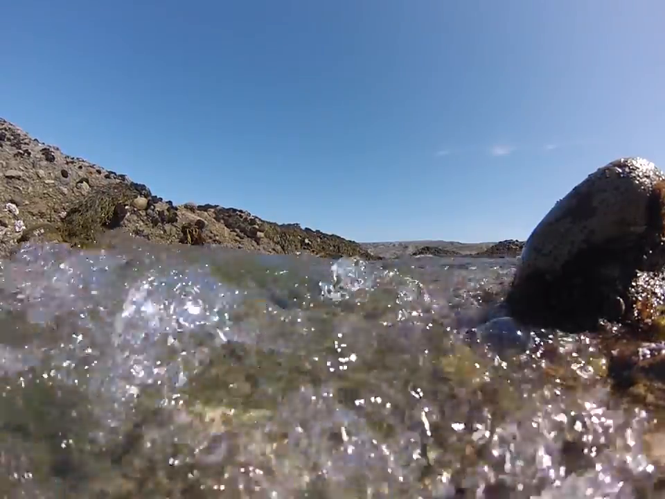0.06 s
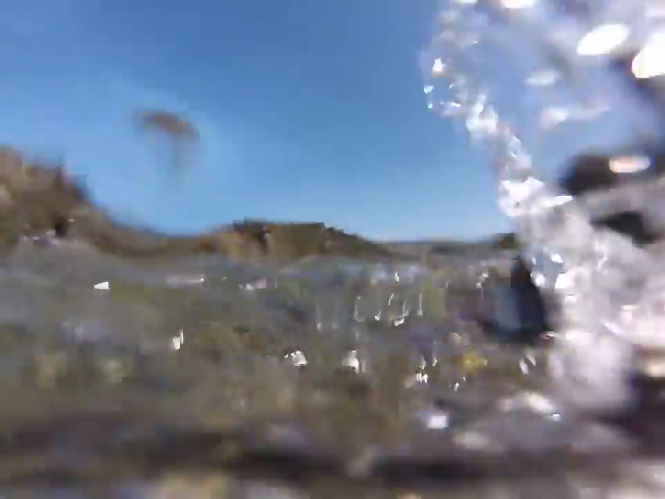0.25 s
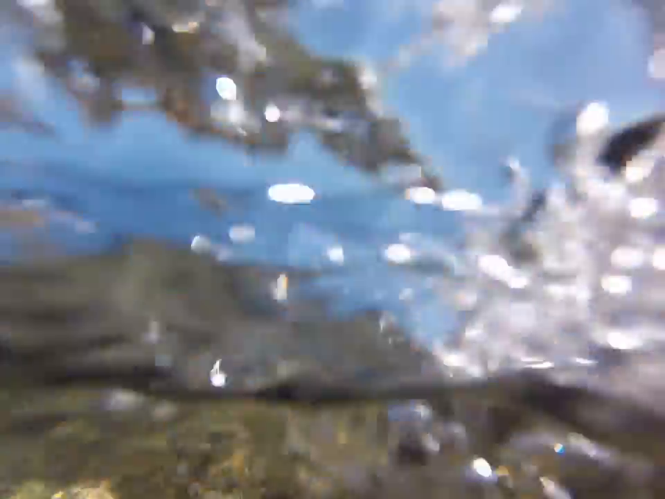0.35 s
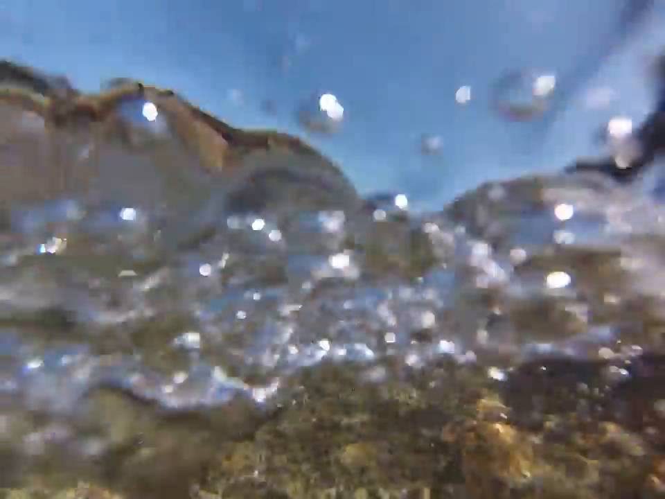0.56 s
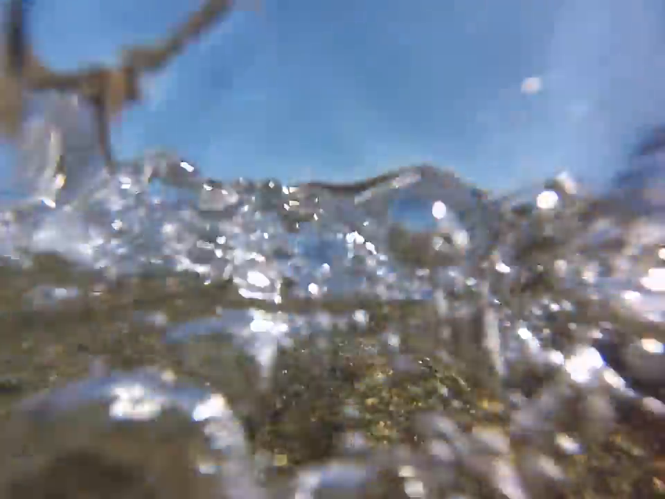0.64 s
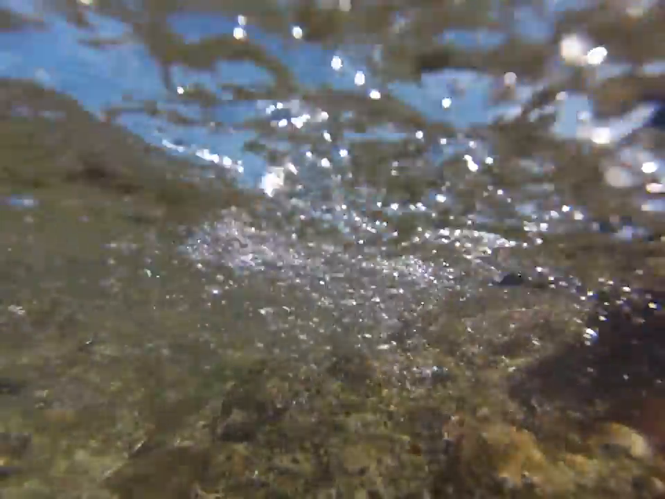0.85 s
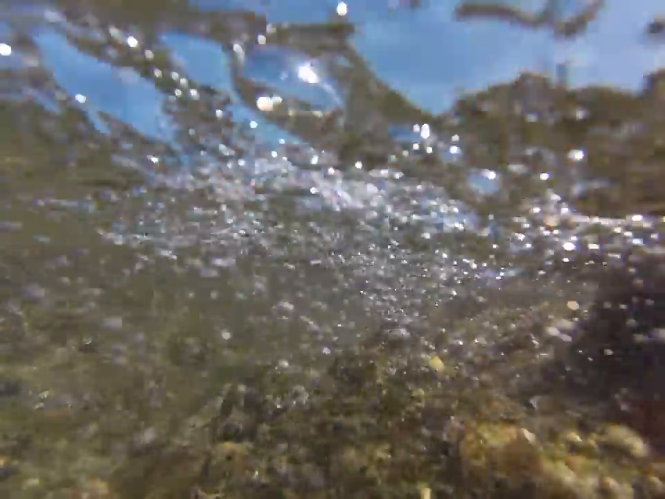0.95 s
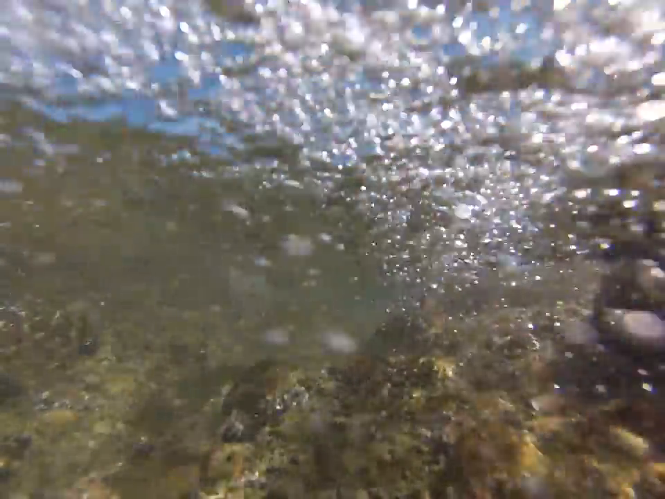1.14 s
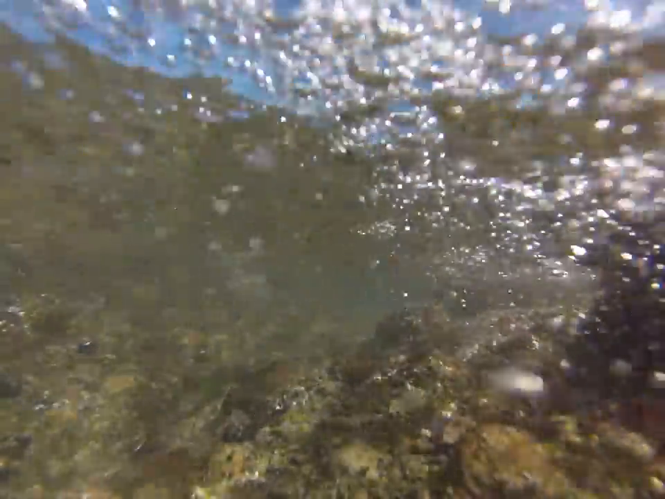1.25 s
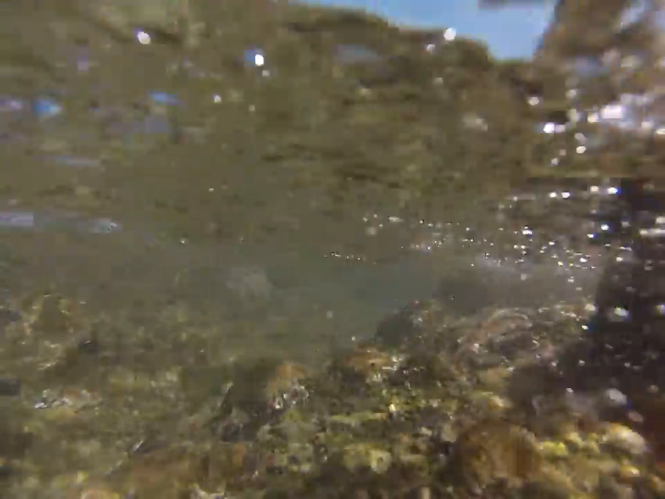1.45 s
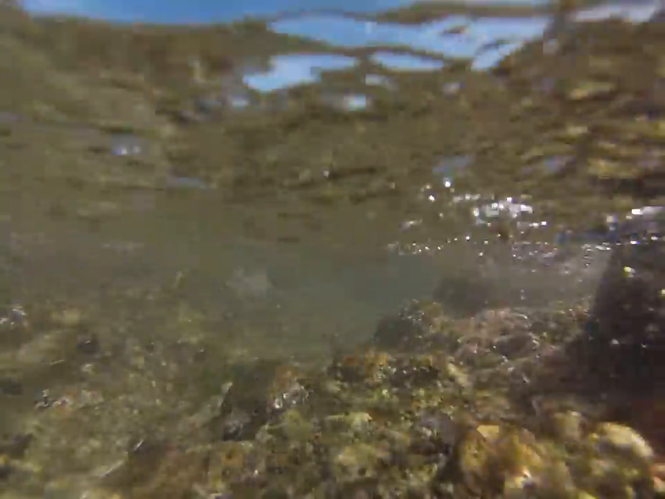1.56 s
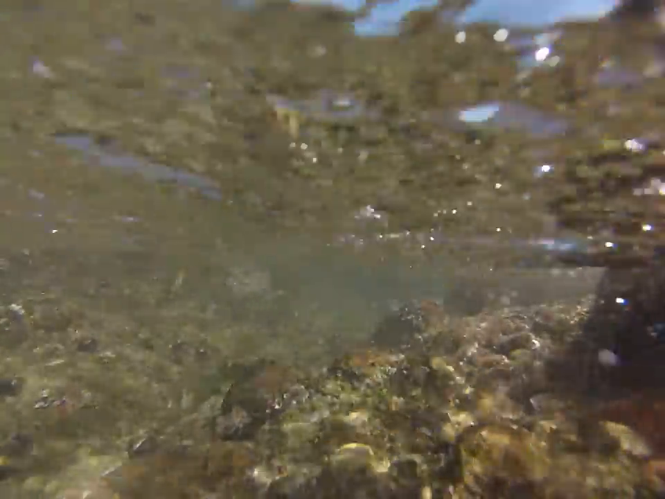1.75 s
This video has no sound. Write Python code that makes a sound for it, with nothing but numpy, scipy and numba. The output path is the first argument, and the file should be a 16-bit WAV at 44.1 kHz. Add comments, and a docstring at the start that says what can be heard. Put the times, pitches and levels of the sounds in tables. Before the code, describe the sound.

Sudden wet splash over a microphone in a waterproof housing, outdoors at the water's edge; then close underwater bubbling, thinning out, a late cluster of glugs with deep rumbling, and a fade to near silence.

```python
"""A wave breaks over a small camera in a waterproof housing at a rocky shore, and the housing goes under.
A faint hiss of shaped noise and the rumble of water on the housing run from the start.
Spray swells and strikes as clouds of tiny rings with a low blow of noise, then cuts off.
Bubbles ring close by as short rising tones, droplets tick, and a swarm of small bubbles gurgles.
Late on, air trapped at the housing glugs in its own resonances while the rumble is strongest."""
import sys
import numpy as np
from scipy import signal
from scipy.fft import rfft, irfft
from scipy.io import wavfile
from numba import njit

SR = 44100
rng = np.random.default_rng(int(sys.argv[2]) if len(sys.argv) > 2 else 0)


def gain_from_db(level_db):
    """Turn a decibel level (scalar or array-like) into a linear amplitude factor."""
    decades = np.asarray(level_db, float) / 20
    return 10 ** decades


def log_audio(samples):
    """Write samples as a 16-bit WAV file to the path given in sys.argv[1]."""
    # one column per channel
    frames = np.atleast_2d(samples).T
    # limit to full scale, then quantise
    limited = np.clip(frames, -1, 1)
    pcm = np.round(limited * 32767).astype(np.int16)
    wavfile.write(sys.argv[1], SR, pcm)


N = 79380  # samples, 1.8 s
RISE_S, GLIDE = 0.00063, 0.13  # swell time constant of a ring; share its pitch climbs over one t60


def level(x, db):
    """Scale to an rms level in dB."""
    return x * gain_from_db(db) / np.sqrt(np.mean(x ** 2))


def curve(table):
    """Gain over time along a table of seconds and dB."""
    rows = np.array(table)
    return gain_from_db(np.interp(np.arange(N) / SR, rows[:, 0], rows[:, 1]))


def band(x, lo_hz, hi_hz):
    """Band-pass between two corner frequencies."""
    return signal.sosfilt(signal.butter(2, [lo_hz, hi_hz], "band", fs=SR, output="sos"), x)


def noise_band(lo_hz, hi_hz, db):
    """Band of noise at an rms level."""
    return level(band(rng.standard_normal(N), lo_hz, hi_hz), db)


@njit
def rings(n, start, size, hz, t60, rise, glide):
    """Damped tones that swell quickly and, where glide is above 0, climb a little as they fade."""
    out = np.zeros(n)
    for k in range(len(start)):
        fall, grow = np.log(1000) / t60[k], 1 / rise
        # time of the envelope's peak, which is scaled to size
        top = np.log(1 + 2 * grow / fall) / grow
        norm = size[k] / ((1 - np.exp(-grow * top)) ** 2 * np.exp(-fall * top))
        first, phase = int(start[k] * SR), 0.
        for i in range(min(int((t60[k] + top) * SR), n - first)):
            t = i / SR
            phase += min(hz[k] * (1 + glide * t / t60[k]) / SR, .4)
            envelope = (1 - np.exp(-grow * t)) ** 2 * np.exp(-fall * t)
            out[first + i] += norm * envelope * np.sin(2 * np.pi * phase)
    return out


def snaps(start, size, t60):
    """A broad, decaying burst of noise where each surface pinches off."""
    marks = np.zeros(N)
    marks[(start * SR).astype(int)] = size
    envelope = signal.lfilter([1], [1, -np.exp(-np.log(1000) / t60 / SR)], marks)
    return envelope * rng.standard_normal(N)


def cloud(per_s, hz, octaves, cycles, spread_db):
    """Bubbles of random time, size, pitch and ring length (cycles on average); rms 1."""
    u = rng.random((4000, 5))
    start = np.cumsum(-np.log(1 - u[:, 0])) / per_s
    # triangular scatter of pitch, octaves being its standard deviation
    pitch = np.clip(hz * 2 ** (octaves * np.sqrt(6) * (u[:, 1] + u[:, 2] - 1)), 300, 15000)
    # squaring makes large bubbles rare; those past the end are silent
    size = gain_from_db(spread_db * u[:, 3] ** 2) * (start < N / SR)
    t60 = cycles * (.5 + u[:, 4]) / pitch
    return level(rings(N, np.minimum(start, N / SR), size, pitch, t60, RISE_S, GLIDE), 0)


# Colour of the faint floor behind the water.
# Each row: frequency in Hz, relative density in dB per Hz.
HISS_COLOUR = [(88, -37), (150, 3), (398, -10), (2140, -24.5), (12700, -28.5), (16000, -51.5)]


def hiss():
    """Steady floor: noise shaped in frequency, at one level throughout."""
    rows, f = np.array(HISS_COLOUR), np.arange(N // 2 + 1) * SR / N + 1
    gain = gain_from_db(np.interp(np.log(f), np.log(rows[:, 0]), rows[:, 1]))
    return level(irfft(rfft(rng.standard_normal(N)) * gain, N), -73.5)


# Force of the wave at the rocks as it nears and strikes the housing.
# Each row: time in seconds, gain in dB on the spray and the low blow.
STRIKE_FORCE = [(0, -76.5), (.235, -64.5), (.26, -37), (.3, -30), (.345, -40), (.36, -59.5), (.47, -59.5)]


def strike():
    """Force of the wave: swells as it nears, peaks at the blow, ends as the water closes; gain over time."""
    end_s = STRIKE_FORCE[-1][0]
    return curve(STRIKE_FORCE) * (np.arange(N) / SR < end_s)


# Water pushing on the housing, right at the microphone.
# Each row: time in seconds, level of the push in dB.
PUSH_LEVEL = [(0, -69), (.18, -63.5), (.3, -58.5), (.55, -51), (1.2, -63.5), (1.36, -49), (1.54, -44),
              (1.8, -71)]


def rumble(near):
    """Water pushes on the housing, sloshes with the swarm and thuds with every nearby burst."""
    push = noise_band(24.1 / 2, 24.1 * 1.84, 0)
    slosh = noise_band(150 / 1.1, 150 * 2, -19)
    # the rectified mid band follows the nearby bursts
    bursts = np.abs(band(near, 450, 2100))
    thud = band(bursts, 138 / 3, 138 * 2) * gain_from_db(-14.5)
    blow = noise_band(138.4 / 2, 138.4 * 2, -11)
    return strike() * blow + curve(PUSH_LEVEL) * push + curve(SWARM_LEVEL) * slosh + thud


def spray():
    """Dense spray, low churn and crackling foam at the strike: crowds of rings and noise snaps."""
    droplets = cloud(per_s=2200, hz=3785, octaves=0.92, cycles=19, spread_db=32)
    churn = gain_from_db(3) * cloud(per_s=2000, hz=1950, octaves=0.393, cycles=20, spread_db=23)
    when, size = rng.random((600, 2)).T
    foam = level(band(snaps(when * N / SR, size * size, TICK_T60_S), 2400, 17000), -12)
    return strike() * (droplets + churn + foam)


def stirring():
    """Every large bubble or glug sheds a short flurry of small ones; gain over time."""
    flurry_s = 0.0055
    starts = np.array([row[0] for row in BUBBLE_RINGS + GLUG_BURSTS])
    marks = np.zeros(N)
    marks[(starts * SR).astype(int)] = gain_from_db(6.5)
    return 1 + signal.lfilter([1], [1, -np.exp(-1 / flurry_s / SR)], marks)


# Small bubbles in the water around the housing, and the slosh that moves with them.
# Each row: time in seconds, gain in dB before the flurries and the mix of layers.
SWARM_LEVEL = [(0, -79), (.23, -51), (.37, -44.5), (.78, -44), (.98, -46), (1.04, -57), (1.1, -47),
               (1.19, -59), (1.4, -52.5), (1.56, -50.5), (1.68, -68)]


def swarm():
    """Gurgle of many small ringing bubbles with finer, higher fizz above it."""
    gurgle = cloud(per_s=900, hz=1394.6, octaves=.55, cycles=42.2, spread_db=18.5)
    fizz = cloud(per_s=1600, hz=5300, octaves=0.75, cycles=17, spread_db=30)
    return curve(SWARM_LEVEL) * stirring() / 2 * (gurgle + gain_from_db(-19.5) * fizz)


# Droplets and tiny bubbles that tick near the microphone.
# Each row: start in seconds, peak of the tone in dB, pitch in Hz.
DROPLET_TICKS = [(0.1866, -47, 7130), (0.2297, -39.5, 7500), (0.4899, -29.5, 10300), (0.5333, -35.5, 9500),
                 (0.5644, -40, 7140), (0.7551, -52, 6000), (0.7881, -45.5, 6700), (0.8492, -38.5, 12000),
                 (0.8786, -45, 11200), (1.089, -39, 7260), (1.2665, -43, 10450), (1.4496, -35.5, 7370)]
TICK_T60_S = 0.0048


def ticks():
    """Tiny bright ticks: a short steady-pitched ring with a snap of noise."""
    start, db, hz = np.array(DROPLET_TICKS, float).T.copy()
    tone = rings(N, start, gain_from_db(db), hz, np.full_like(start, TICK_T60_S), RISE_S / 2, 0.)
    return tone + band(snaps(start, gain_from_db(db - 1), TICK_T60_S), 2000, 15000)


# Glugs of an air pocket trapped at the housing.
# Each row: start in seconds, base level in dB, extra level of overtones and snap in dB.
GLUG_BURSTS = [(1.345, -36, -5.5), (1.388, -35.5, 0), (1.419, -40, -7), (1.429, -28.5, 4),
               (1.462, -36.5, 2.5), (1.502, -45.5, 2.5)]
# What the pocket rings with, the low note first.
# Each row: starting pitch in Hz (overtones scatter around it), added level in dB, t60 in seconds.
POCKET_MODES = [(850, 11, 0.016), (1310, 8, 0.0047), (1954, 10.5, 0.0092), (2980, -4, 0.01)]


def glugs():
    """Each glug rings the pocket's modes, the overtones a little off pitch each time."""
    start, db, over_db = np.array(GLUG_BURSTS, float).T.copy()
    out = band(snaps(start, gain_from_db(db + over_db - 12.5), 0.0085), 99, 7200)
    for k, (hz, mode_db, t60) in enumerate(POCKET_MODES):
        overtone = min(k, 1)  # 0 for the low note
        pitch = hz * (1 + 0.054 * overtone * rng.standard_normal(len(start)))
        size = gain_from_db(db + mode_db + overtone * over_db)
        out = out + rings(N, start, size, pitch, np.full_like(start, t60), RISE_S / 2, GLIDE)
    return out


# The clearest bubbles, close to the microphone.
# Each row: start in seconds, peak in dB before the flutter, starting pitch in Hz, ring t60 in seconds.
BUBBLE_RINGS = [(0.239, -17, 1327, 0.016), (0.2664, -12, 5630, 0.00073), (0.283, -26.5, 629, 0.045),
                (0.2855, -12.5, 2140, 0.0043), (0.2984, -12, 3610, 0.0073), (0.3096, -15, 2620, 0.004),
                (0.3728, -34.5, 3400, 0.027), (0.403, -19.5, 1347, 0.025), (0.4477, -17.5, 4950, 0.0016),
                (0.4572, -21, 2470, 0.0028), (0.559, -24, 4260, 0.0082), (0.591, -33, 2246, 0.028),
                (0.6529, -36.5, 1188, 0.086), (0.6741, -23.5, 4020, 0.0011), (0.679, -23, 2292, 0.009),
                (0.717, -44, 561, 0.4), (0.763, -41.5, 3600, 0.011), (0.771, -28.5, 1051, 0.069),
                (0.8065, -40.5, 4620, 0.0041), (0.8145, -35, 1160, 0.025), (0.847, -35, 2130, 0.011),
                (0.882, -37, 1350, 0.026), (0.9545, -26.5, 2346, 0.0041), (0.98, -33.5, 3950, 0.0015),
                (1.0534, -35, 945, 0.012), (1.083, -33, 546, 0.011), (1.0939, -36.5, 890, 0.035),
                (1.1115, -18, 1883, 0.0068), (1.146, -26, 1870, 0.0042), (1.1538, -26.5, 3770, 0.0052),
                (1.2202, -48, 1970, 0.043), (1.241, -37.5, 1565, 0.11), (1.2613, -25.5, 2040, 0.012),
                (1.282, -31.5, 5440, 0.011), (1.2983, -25, 1620, 0.0055), (1.359, -31.5, 1110, 0.012),
                (1.3737, -25, 799.4, 0.058), (1.39, -27.5, 1660, 0.015), (1.4609, -28.5, 6090, 0.0041),
                (1.4676, -33.5, 3970, 0.012), (1.553, -35, 1750, 0.0074), (1.538, -36.5, 734, 0.054)]


def bubbles():
    """Single bubbles born close to the microphone; they flutter as the water jostles them."""
    start, db, hz, t60 = np.array(BUBBLE_RINGS, float).T.copy()
    flutter = 1 + noise_band(41, 340, -8)
    tones = rings(N, start, gain_from_db(db), hz, t60, RISE_S, GLIDE)
    # small, high bubbles snap harder
    snap_size = gain_from_db(db - 13.5) * hz / 2000
    return flutter * tones + band(snaps(start, snap_size, 0.011), 260, 4800)


def housing_ring(near):
    """Short after-ring of the housing: nearby sounds convolved with decaying band noise."""
    t60_s, hz = 0.02, 1813
    t = np.arange(SR // 8) / SR
    ring = band(rng.standard_normal(len(t)), hz / 1.17, hz * 2) * 1000 ** (-t / t60_s)
    return signal.fftconvolve(near, level(ring, -13.5) / np.sqrt(len(t)))[:N]


def scene():
    """The water sounds with the after-ring of the housing, the rumble and the hiss."""
    near = bubbles() + glugs() + ticks() + swarm() + spray()
    return (near + housing_ring(near) + rumble(near) + hiss())[None]


def roll_off(x):
    """The treble ends steeply here."""
    return signal.sosfilt(signal.butter(12, 16520, fs=SR, output="sos"), x)


def record(dry):
    """The recorder cuts the top steeply above 16.2 kHz."""
    cut = signal.sosfilt(signal.ellip(12, .2, 70, 16200, fs=SR, output="sos"), dry)
    return roll_off(cut)


dry = scene()
out = record(dry)
log_audio(out)
```